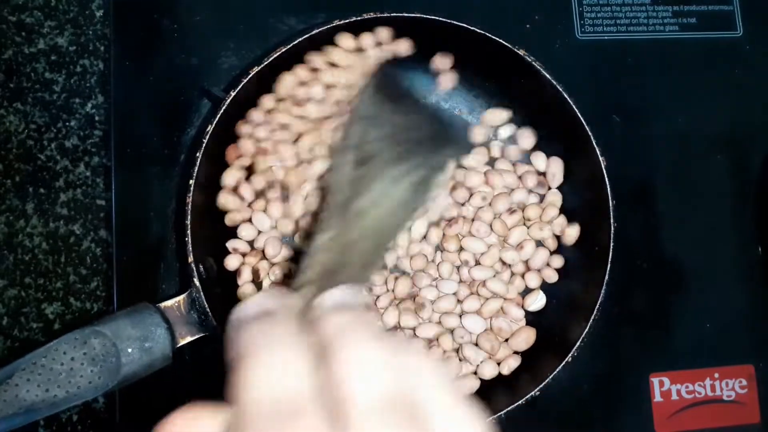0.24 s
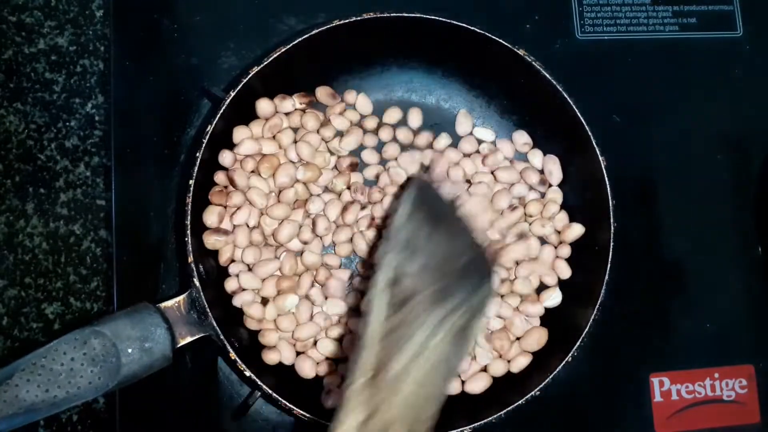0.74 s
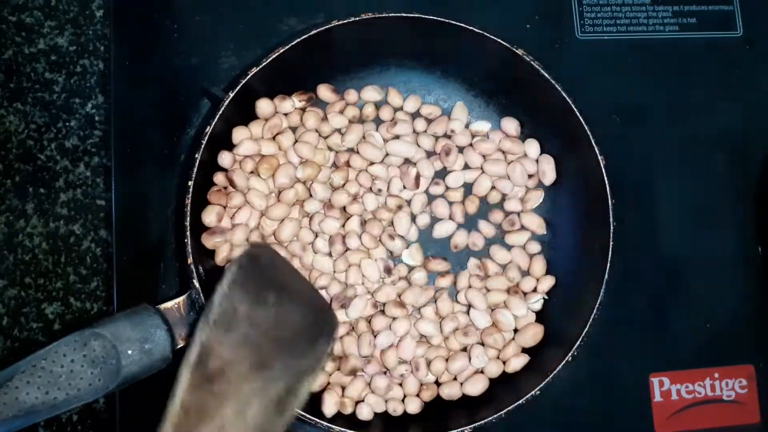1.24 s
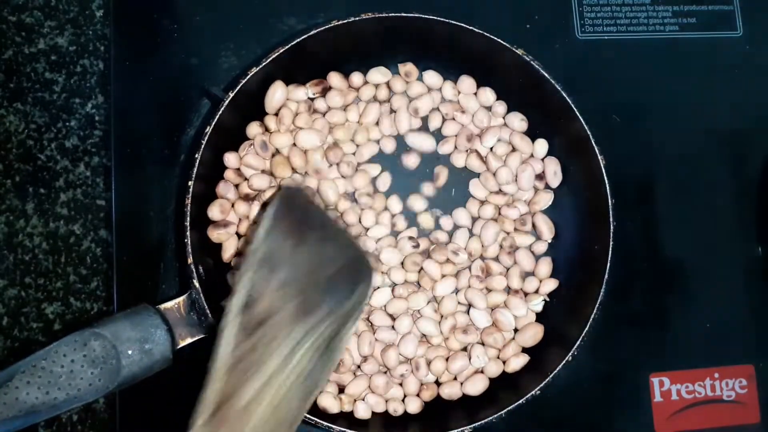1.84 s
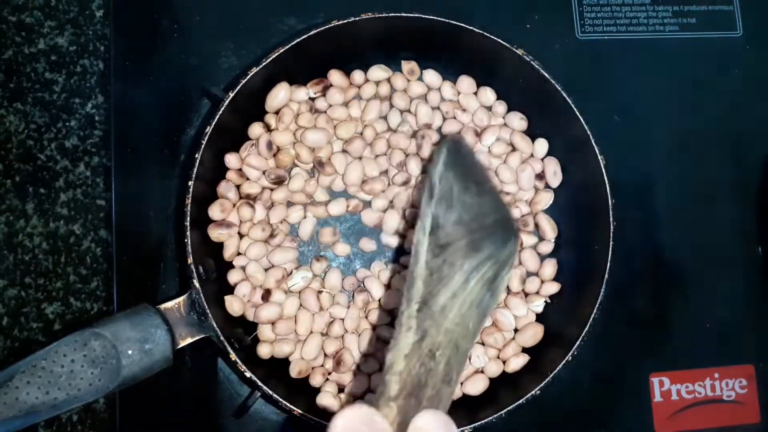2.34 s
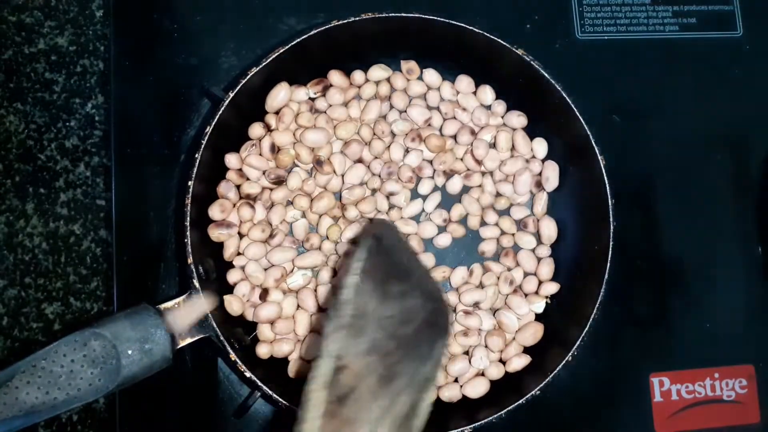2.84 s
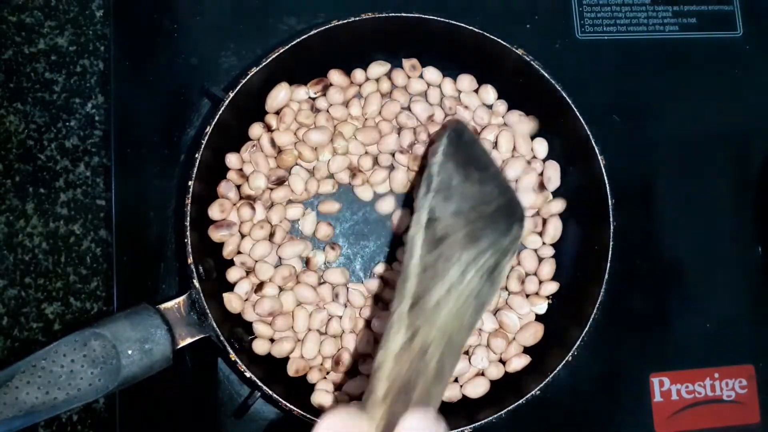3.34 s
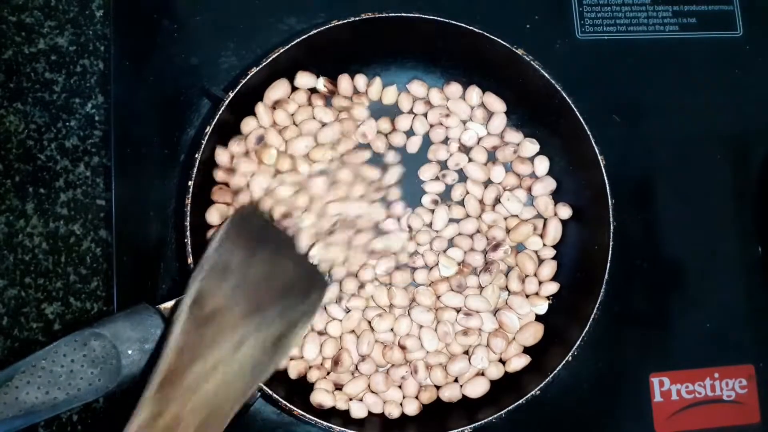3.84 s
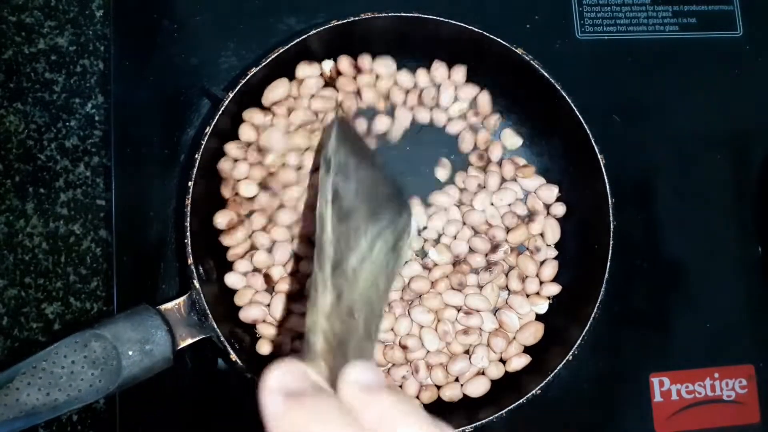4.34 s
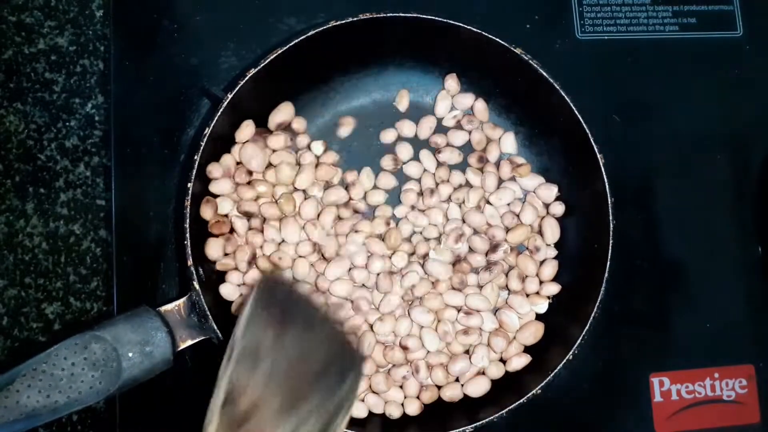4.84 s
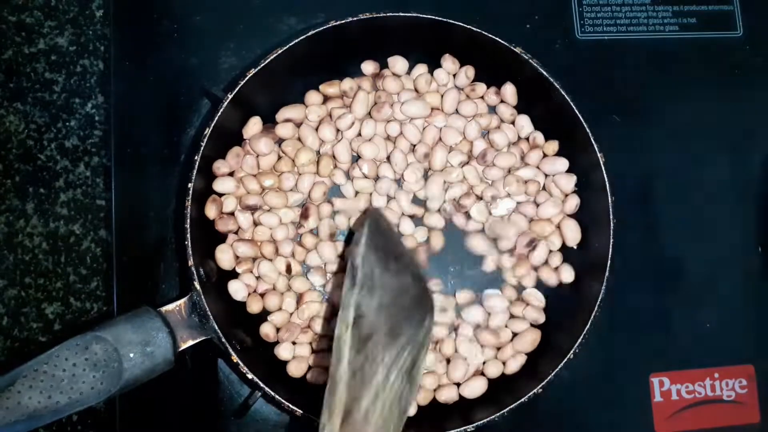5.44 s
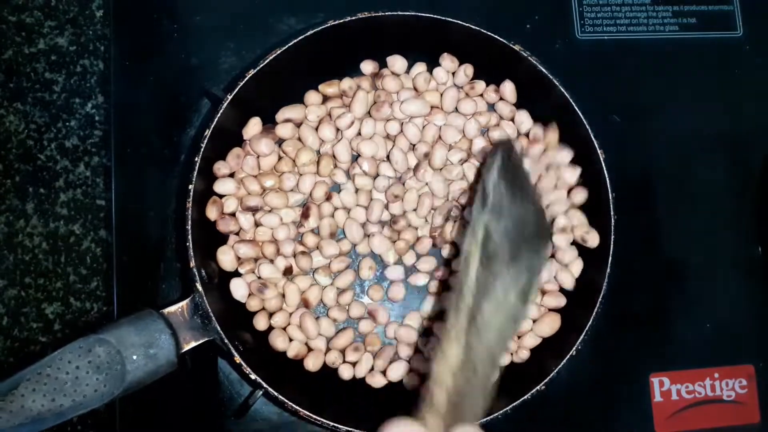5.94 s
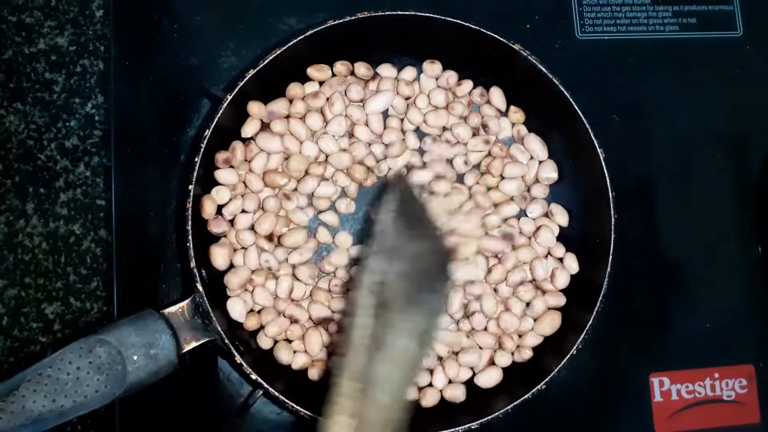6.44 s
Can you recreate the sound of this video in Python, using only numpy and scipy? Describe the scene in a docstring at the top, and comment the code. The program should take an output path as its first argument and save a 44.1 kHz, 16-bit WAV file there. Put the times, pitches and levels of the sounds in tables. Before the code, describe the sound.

Steady low fan hush lies beneath brisk, uneven stirring of roasting peanuts. Each stroke brings a papery swish, a hard rattling tumble and a soft low bump from the glass cooktop. Metallic taps and woody knocks punctuate it; dry crackling pops jump out mid-way, the largest with a small air thud, and the spatula edge grates briefly near 4.9 seconds. Close stereo microphone, short dry kitchen reflections.

```python
"""Peanuts are stirred in a small pan with a wooden spatula, heard close by at two ports.
From the start a fan hums (shaped noise) and strokes make nuts tumble (random impacts through pan modes),
skins rustle (shaped noise) and the glass cooktop shake. Single nuts soon ring the pan, the spatula knocks
(damped modes), skins snap (noise bursts); later the spatula edge scrapes (narrow resonances) and the biggest
snap pushes a puff of air (a smooth pulse). A small kitchen answers throughout (decaying noise tails)."""
import sys
import numpy as np
from scipy import signal
from scipy.fft import rfft, irfft, next_fast_len
from scipy.io import wavfile
from scipy.ndimage import uniform_filter1d, map_coordinates

SR = 44100
rng = np.random.default_rng(int(sys.argv[2]) if len(sys.argv) > 2 else 0)


def dump_mix(stems):
    """Bounce the given channels to the path in sys.argv[1] as a 16-bit WAV at rate SR."""
    frames = np.atleast_2d(stems).T  # one column per channel
    limited = np.clip(frames, -1, 1)  # hard clip at full scale
    pcm = np.round(limited * 32767).astype(np.int16)
    wavfile.write(sys.argv[1], SR, pcm)


N = 295911

# fan and room hush, spectrum shape: pitch_hz, density_db_per_hz
FAN_SPECTRUM = [(22, -7.5), (95, -2.5), (585, -17), (1300, -18), (1810, -22), (2820, -31.5), (14700, -40),
                (16000, -58)]
# spatula strokes, levels relative: start_s, sweep_s, skins_db, nuts_delay_s, roll_s, nuts_db,
# nuts_fall_db_per_s, push_delay_s, push_s, push_db
STROKES = [(-.15, 0.065, -49, 0.026, 0.11, -39.5, 112, 0.04, 0.044, -55),
           (0.192, 0.076, -43.5, -0.027, 0.18, -39.5, 85, -0.024, 0.046, -41),
           (0.462, 0.16, -45.5, 0.12, 0.17, -42.5, 72, 0.04, 0.067, -39.5),
           (0.876, 0.15, -48, 0.084, 0.077, -39.5, 197, -0.012, 0.2, -49.5),
           (1.255, 0.082, -45, 0.056, 0.25, -42, 70, -0.057, 0.25, -48),
           (1.598, 0.13, -49, -0.067, 0.31, -39.5, 195, 0.025, 0.08, -39),
           (1.926, 0.25, -51.5, 0.07, 0.16, -40.5, 81, 0.08, 0.071, -53),
           (2.395, 0.12, -44.5, -0.046, 0.19, -37, 159, -0.021, 0.16, -41.5),
           (3.052, 0.071, -46, 0.041, 0.079, -38, 69, -0.033, 0.16, -44),
           (3.459, 0.069, -45.5, -0.0071, 0.13, -36.5, 149, -0.086, 0.15, -49),
           (3.785, 0.078, -41.5, 0.054, 0.1, -37.5, 72, 0.02, 0.097, -44.5),
           (4.149, 0.12, -47, 0.029, 0.18, -39.5, 136, 0.017, 0.096, -45.5),
           (4.553, 0.11, -51.5, 0.11, 0.024, -36.5, 302, 0.015, 0.087, -42),
           (4.916, 0.17, -48.5, 0.012, 0.26, -38.5, 78, -0.031, 0.14, -40),
           (5.302, 0.069, -48.5, 0.059, 0.072, -36.5, 120.5, 0.0017, 0.14, -48.5),
           (5.629, 0.13, -48, 0.061, 0.1, -43.5, 108.5, 0.026, 0.091, -39.5),
           (5.987, 0.063, -43.5, 0.023, 0.061, -36.5, 66, 0.052, 0.087, -43.5),
           (6.24, 0.18, -48, 0.12, 0.06, -33.5, 73, 0.044, 0.18, -44.5),
           (6.562, 0.12, -49.5, -0.053, 0.13, -41.5, 110, 0.084, 0.047, -36)]
# rubbing skins, spectrum shape: pitch_hz, density_db_per_hz
SKINS_SPECTRUM = [(1060, -55), (1800, -1), (2410, -4), (3640, -3.5), (5150, -9), (13400, -8.5),
                  (16000, -5.5)]
# lowest pan floor modes: pitch_hz, width_hz, level_db
PAN_LOW_MODES = [(1060, 46, -18.5), (1212, 49, -7.5), (1294.7, 33.9, 6.5), (1326.3, 52.3, 3),
                 (1363, 98, -4.5), (1588, 192, -15.5)]
# upper pan floor modes: pitch_hz, width_hz, level_db
PAN_HIGH_MODES = [(2340, 78, 3), (2410, 93, -14), (3700, 59, -6), (4380, 130, -11.5), (5485, 100, -11)]
# dry click of a nut: pitch_hz, width_hz, level_db
NUT_MODES = [(1950, 780, 0.5), (3040, 1700, -6.5)]
# glass cooktop modes: pitch_hz, width_hz, level_db
GLASS_MODES = [(107, 19, -1.5), (176.4, 15.7, 3), (261, 11, 2), (323, 17.5, -3), (367.2, 10.7, 1),
               (449.7, 5.1, 1.5), (527, 20, -6.5), (668, 28, -9.5), (738.7, 18, -2.5), (1109, 92, 2)]
# clear strikes on the pan floor: start_s, low_modes_peak_db, upper_modes_db (re low)
TAPS = [(0.157, -27.5, -8), (0.2729, -28.5, -5), (0.3773, -22, 1.5), (0.8819, -33, 4), (1.0416, -30.5, 9),
        (1.159, -29.5, -1.5), (1.3342, -7.5, -15.5), (1.5098, -26.5, -17), (1.6141, -21, -4.5),
        (1.727, -25, 1.5), (1.7778, -23, -5.5), (1.8049, -26, -1), (2.0813, -25, -5), (2.2648, -31.5, 4),
        (2.2853, -31, 6.5), (2.345, -28, 8), (2.441, -25, 10), (2.4863, -17, 0), (2.625, -30, -20),
        (3.0681, -20.5, -7), (3.077, -4.5, -12.5), (3.1698, -27.5, 2), (3.286, -25.5, -35),
        (3.3326, -22, -27), (3.461, -21.5, -8), (3.551, -25.5, -23), (3.8278, -17.5, -20),
        (3.928, -20.5, -15), (4.0105, -30, 3), (4.0958, -32.5, 5), (4.151, -21.5, -27), (4.2943, -22, -4.5),
        (4.541, -26.5, -8.5), (4.674, -20.5, -40), (4.9377, -15, -6), (5.0439, -35.5, 6.5),
        (5.098, -20.5, -6), (5.1567, -25.5, -2.5), (5.21, -24.5, -20), (5.3705, -26.5, 2.5),
        (5.441, -27, 3), (5.4951, -29, 7.5), (5.664, -23, -5.5), (5.7082, -23.5, -11), (5.731, -28, -16),
        (6.0492, -22, -12), (6.113, -28.5, -16), (6.3814, -27, -13), (6.509, -21, -32)]
# spatula knocks: start_s, level_db, wood_pitch_hz
KNOCKS = [(0.232, -23, 910), (1.334, -19, 1040), (2.448, -26.5, 740), (2.873, -35.5, 1000),
          (3.077, -19, 1120), (3.821, -22.5, 670), (4.542, -20.5, 1100), (4.938, -16.5, 756),
          (5.6652, -14, 726)]
# snapping skins: start_s, level_db, hiss_db (re crack), dull_body_db (re bright)
SNAPS = [(0.4204, -31, -32, -14), (0.4528, -39.5, -24, 14), (0.6625, -20, -19, -33),
         (2.0104, -6, -22, -7.5), (2.36, -34.5, -30, 9), (2.874, -27.5, -24, -17.5), (2.976, -40, 1.5, -8),
         (3.8219, -5, -17, -4), (4.1704, -11, -24.5, 4.5), (4.3109, -21.5, -23, -26),
         (4.8394, -16, -21, -7.5), (4.9267, -21, -17, 3.5), (5.936, -25, -23, -3.5), (6.238, -31, -18, -8),
         (6.578, -30, -13, -21)]
# spatula edge grating along the pan: start_s, length_s, pitch_hz, level_db
SCRAPES = [(1.263, 0.026, 7370, -46), (4.91, 0.025, 3660, -41), (4.919, 0.018, 5710, -39.5),
           (4.928, 0.029, 2360, -42)]
# decay of the room's answer: pitch_hz, t60_s
KITCHEN_DECAY = [(200, 0.15), (2000, 0.15), (12000, 0.03)]
# phase by which the left port leads: pitch_hz, lead_rad
PORT_LEAD = [(100, 0), (600, .2), (1400, .85), (2300, 2.1), (4300, 2.7), (5200, 3.8), (5800, 2 * np.pi)]
# left-right likeness: pitch_hz, correlation
PORT_LIKENESS = [(30, .6), (70, .96), (300, .78), (1300, .88), (2400, .3), (4400, .45), (8000, .84),
                 (15000, .88)]
# overall band edges, low cut and steep high cut: pitch_hz, gain_db
BAND_EDGES = [(30, -8), (80, 0), (15800, 0), (15950, -30), (16900, -34)]

FAN_DB = -54.5
# envelope slopes around a stroke: (rise, fall)
SKINS_SLOPE_DB_PER_S, PUSH_SLOPE_DB_PER_S = (104, 110), (330, 204)
NUTS_RISE_DB_PER_S = 177
BOOM_HZ = 93.7  # centre of the lowest cooktop mode
CONTACT_DB_PER_DB, CONTACT_REF_DB = 0.51, -23.5  # contact shortens with harder blows; peak of the nominal one
WOOD_DB, WOOD_WIDTH_HZ = -4, 69
KNOCK_MUTE_HZ = 14  # the pressed spatula widens every glass mode
PUFF_AT_S, PUFF_S = 3.83, 0.0035
PUFF_LEFT_DB, PUFF_RIGHT_DB = -22.5, -33.5
BAND_TOP_HZ = 16984


def amp(db):
    """Decibels to gain."""
    return 10 ** (np.asarray(db) / 20)


def unit(x):
    """Scaled to rms 1."""
    return x / np.sqrt(np.mean(x ** 2) + 1e-20)


def along(points, hz):
    """Table of (Hz, value) interpolated on a log frequency axis."""
    f, v = np.transpose(points)
    return np.interp(np.log(hz + 20), np.log(f + 20), v)


def filtered(x, response):
    """x times a complex response of frequency."""
    m = next_fast_len(N + SR // 2)
    spectrum = rfft(x, m) * response(np.fft.rfftfreq(m, 1 / SR))
    return irfft(spectrum, m)[..., :N]


def shaped(x, spectrum):
    """x shaped by a (Hz, dB per Hz) table, rms 1."""
    return unit(filtered(x, lambda hz: amp(along(spectrum, hz))))


def body(modes):
    """Response of a set of damped resonances, alternating in sign."""
    def response(f):
        total = 0
        for k, (c, w, db) in enumerate(modes):
            total = total + (-1) ** k * amp(db) * 1j * f * w / (c * c - f * f + 1j * f * w)
        return total
    return response


def narrow(x, hz, width_hz):
    """x through one resonance twice, rms 1."""
    return unit(filtered(x, lambda f: body([(hz, width_hz, 0)])(f) ** 2))


def hail(per_s, spread_db):
    """Random impacts of scattered size, rms 1."""
    hits = rng.random(N) < per_s / SR
    size = amp(spread_db * np.clip(rng.standard_normal(N), -2, 2))
    return unit(hits * size * rng.standard_normal(N))


def wobble(rate):
    """A smooth random curve, rate knots a second."""
    knots = rng.standard_normal(int(N * rate / SR) + 4)
    return map_coordinates(knots, [np.arange(N) * rate / SR])


def wander(x, samples, rate):
    """Resonances drift a little as the load on the pan shifts: a wobbling time axis."""
    return map_coordinates(x, [np.arange(N) + samples * wobble(rate)])


def patchy(x, depth_db):
    """Random patches of gain over time and frequency."""
    z = signal.stft(x, nperseg=256)[2]
    field = uniform_filter1d(rng.standard_normal(z.shape), size=7, axis=0)
    field = uniform_filter1d(field, size=12, axis=1)
    return signal.istft(z * amp(depth_db * unit(field)), nperseg=256)[1][:N]


def strokes(start_s, length_s, db, slope):
    """Gain over time: each stroke swells, holds and dies away; overlapping strokes add in power."""
    t = np.arange(0, N + 64, 64)[:, None] / SR
    rise_db = slope[0] * np.maximum(start_s - t, 0)
    fall_db = slope[1] * np.maximum(t - start_s - length_s, 0)
    gain = np.sqrt((amp(db - rise_db - fall_db) ** 2).sum(1))
    return np.interp(np.arange(N) / SR, t[:, 0], gain)


def strike(rows, modes, contact_cycles, scatter_db, mute_hz):
    """Blows of (s, peak dB); each wakes the modes anew; harder ones are shorter and, if muted, more damped."""
    out, t = np.zeros(N + SR), np.arange(SR // 5) / SR
    hz, width, db = np.transpose(modes)[..., None]
    luck = rng.standard_normal((len(rows), len(modes), 2))
    for (s, peak_db), (size, detune) in zip(rows, luck.transpose(0, 2, 1)[..., None]):
        fade = np.exp(-np.pi * (width + mute_hz * amp(peak_db)) * t)
        contact = contact_cycles * amp(-CONTACT_DB_PER_DB * (peak_db - CONTACT_REF_DB))
        swell = 1 - np.exp(-t * hz / contact)
        tone = np.sin(2 * np.pi * hz * (1 + 0.0052 * detune) * t)
        ring = (amp(db + scatter_db * size) * swell * fade * tone).sum(0)
        out[round(s * SR):][:len(t)] += amp(peak_db) * ring / np.abs(ring).max()
    return out[:N]


def fan():
    """The cooktop's cooling fan and the room's hush: steady shaped noise."""
    return amp(FAN_DB) * shaped(rng.standard_normal(N), FAN_SPECTRUM)


def tumbling(tumble):
    """Rolling nuts hail on the pan: many contacts ring the low modes, clicks add their own dry body."""
    falls = tumble * hail(650, spread_db=4.5)
    clicks = tumble * hail(55, spread_db=3)
    pan = amp(25.5) * wander(filtered(falls, body(PAN_LOW_MODES)), 34.9, rate=7)
    pan += filtered(amp(-12) * falls + clicks, body(NUT_MODES))
    # separate contacts wake each upper mode on its own
    high = np.zeros(N)
    for mode in PAN_HIGH_MODES:
        contacts = tumble * hail(700, spread_db=4) + clicks
        high += wander(filtered(contacts, body([mode])), 13.8, rate=12)
    return pan + amp(7) * patchy(high, depth_db=2.5)


def rustling(rustle):
    """Dry skins rub: fine impacts and noise, patchy in time and frequency."""
    grains = amp(2.5 * wobble(45)) * hail(2000, spread_db=4)
    rub = patchy(grains + 1.1 * rng.standard_normal(N), depth_db=2.4)
    return amp(1.8 * wobble(16)) * rustle * shaped(rub, SKINS_SPECTRUM)


def shaking(tumble, push, rustle):
    """Drag shakes the glass modes; each push swings the lowest one, its pitch shifting with the load."""
    drag = amp(-35.5) * tumble + amp(-14) * push + amp(-2.0) * rustle
    jolts = amp(3.0 * wobble(11)) * hail(250, spread_db=2.5)
    glass = drag * unit(filtered(jolts, body(GLASS_MODES)))
    swing = np.sin(2 * np.pi * np.cumsum(BOOM_HZ + 2 * wobble(10)) / SR)
    boom = amp(-1.5 + 2.5 * wobble(14)) * (push + amp(-58.5)) * swing
    return glass + boom


def stirring():
    """Each stroke rubs skins, rolls nuts and pushes on the glass under the pan, each with its own timing."""
    s, sweep, skins_db, follow, roll, nuts_db, settle, press, bear, push_db = np.transpose(STROKES)
    rustle = strokes(s, sweep, skins_db, SKINS_SLOPE_DB_PER_S)
    tumble = strokes(s + follow, roll, nuts_db, (NUTS_RISE_DB_PER_S, settle))
    push = strokes(s + press, bear, push_db, PUSH_SLOPE_DB_PER_S)
    return tumbling(tumble) + rustling(rustle) + shaking(tumble, push, rustle)


def taps():
    """Single nuts and the spatula tip click and ring the pan floor."""
    low = [(s, db) for s, db, _ in TAPS]
    high = [(s, db + high_db) for s, db, high_db in TAPS]
    ring = strike(low, PAN_LOW_MODES, 3.7, 4.4, mute_hz=118)
    ring += strike(high, PAN_HIGH_MODES, 0.8, 3.1, mute_hz=120)
    return ring + amp(-7.5) * strike(high, NUT_MODES, 1.0, 5, mute_hz=0)


def knocks():
    """A short wooden blow rings spatula and glass, hardly its lowest modes; the spatula chatters after it."""
    muted = [(hz, width + KNOCK_MUTE_HZ, db + 10 * np.log10(width)) for hz, width, db in GLASS_MODES]
    chatter = [(s + .009 * k ** 1.3, db - 8 * k) for s, db, _ in KNOCKS for k in range(3)]
    wood = np.zeros(N)
    for s, db, hz in KNOCKS:
        wood_modes = [(hz, WOOD_WIDTH_HZ, 0), (0.83 * hz, 500, 5)]
        wood += strike([(s, db + WOOD_DB)], wood_modes, 0.16, 0.6, mute_hz=0)
    glass = amp(-3.5) * strike(chatter, muted, 1.35, 3, mute_hz=30)
    return filtered(wood + glass, lambda hz: 1j * hz / (300 + 1j * hz))  # 300 Hz high-pass


def snaps():
    """A skin cracks in a few milliseconds, then steam sputters out of it; a duller body adds to the crack."""
    bright, dull, t = np.zeros(N + SR), np.zeros(N + SR), np.arange(SR // 2) / SR
    crack = np.exp(-(t / .0022) ** 2) * (1 - np.exp(-t / .0002))
    for s, db, hiss_db, dull_db in SNAPS:
        sputter_db = 2.5 * wobble(60)[:len(t)]
        steam = amp(-60 * t / 0.36 + sputter_db) * (1 - np.exp(-(t / 0.004) ** 2))  # t60 0.36 s
        burst = amp(db - 5.5) * (crack + amp(hiss_db) * steam)
        bright[round(s * SR):][:len(t)] += burst
        dull[round(s * SR):][:len(t)] += amp(dull_db) * burst
    bright_noise = narrow(rng.standard_normal(N), 12700, 18000)
    dull_noise = narrow(rng.standard_normal(N), 4400, 3300)
    return bright[:N] * bright_noise + dull[:N] * dull_noise


def scrapes():
    """Gritty slips of the spatula edge make one narrow pan resonance each sing."""
    out = np.zeros(N)
    for s, length_s, hz, db in SCRAPES:
        sing = narrow(hail(990, spread_db=3), hz, .05 * hz)
        out += strokes(np.array([s]), length_s, db, (900, 400)) * sing
    return out


def puff():
    """Air pushed by the biggest snap: a soft low pulse, mostly at the left port."""
    pulse = -np.exp(-((np.arange(N) / SR - PUFF_AT_S) / PUFF_S) ** 2)
    return pulse * amp([[PUFF_LEFT_DB], [PUFF_RIGHT_DB]])


def kitchen(x):
    """Room answer with a decay per frequency; a fresh random tail for every block of 8192 samples."""
    out, step, delay = np.zeros((2, N + SR)), 8192, 200  # samples
    for start in range(0, N, step):
        hz, t, z = signal.stft(rng.standard_normal((2, SR // 5)), SR, nperseg=256)
        t60 = along(KITCHEN_DECAY, hz)[:, None]
        tail = signal.istft(z * amp(-60 * t / t60) / np.sqrt(t60), SR, nperseg=256)[1]
        tail = tail / np.linalg.norm(tail, axis=1, keepdims=True)
        answer = signal.fftconvolve(x[None, start:start + step], tail, axes=1)
        out[:, start + delay:][:, :answer.shape[1]] += answer
    return out[:, :N]


def ports(a, b):
    """Two ports hear a alike, up to a phase lead; b is the part in which they differ."""
    def turn(hz):
        return np.arccos(np.clip(along(PORT_LIKENESS, hz), -1, 1)) / 2

    def lead(hz):
        return np.exp(.5j * np.outer([1, -1], along(PORT_LEAD, hz)))

    alike = filtered(a, lambda hz: np.cos(turn(hz)) * lead(hz))
    return alike + filtered(b, lambda hz: np.outer([1, -1], np.sin(turn(hz))) * lead(hz))


def scene():
    """Everything in the pan, the fan and the room; part of the echoes and fan differs between the ports."""
    near = stirring() + taps() + knocks() + snaps() + scrapes()
    shared, apart = kitchen(near)
    return ports(near + amp(-10.5) * shared + fan(), apart + fan()) + puff()


def record(dry):
    """Overall band edges: low cut below 80 Hz, steep cut near 16 kHz, nothing above 16984 Hz."""
    return filtered(dry, lambda hz: amp(along(BAND_EDGES, hz)) * (hz < BAND_TOP_HZ))


dry = scene()
out = record(dry)
dump_mix(out)
```